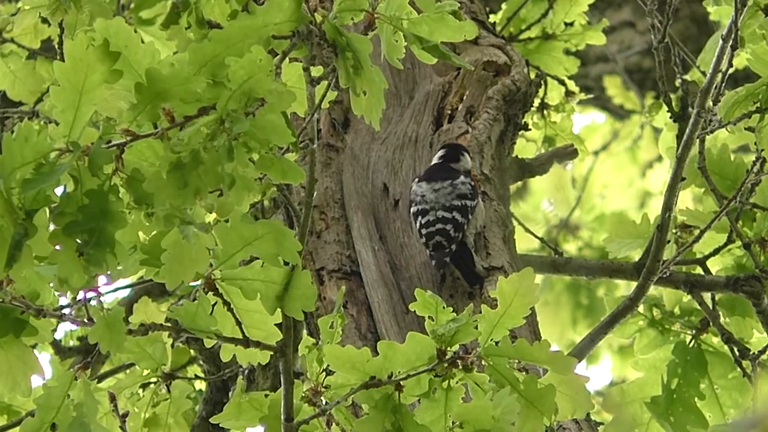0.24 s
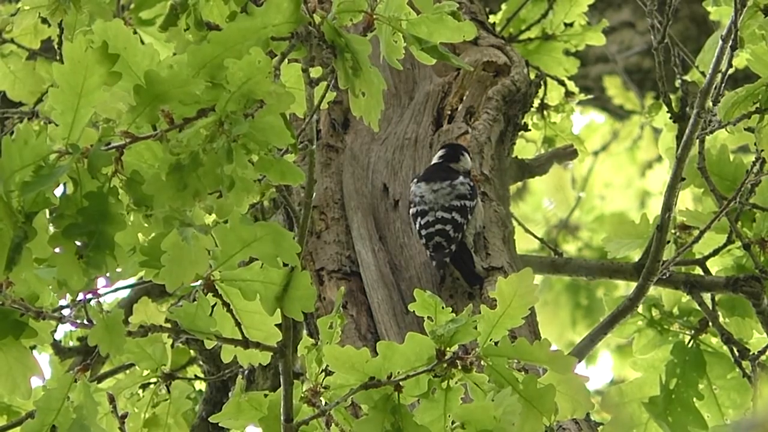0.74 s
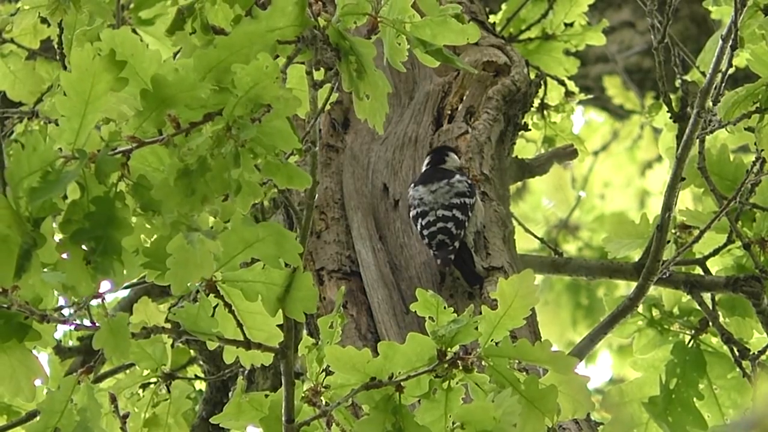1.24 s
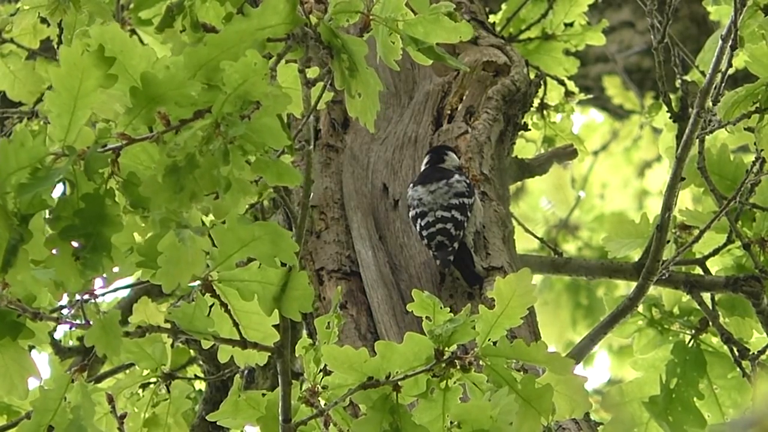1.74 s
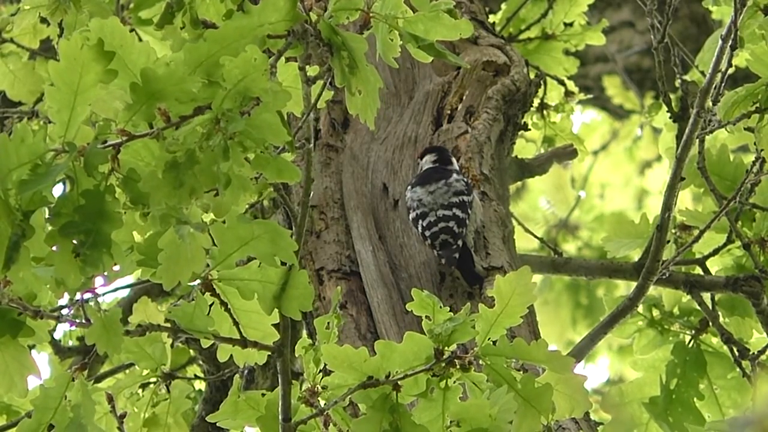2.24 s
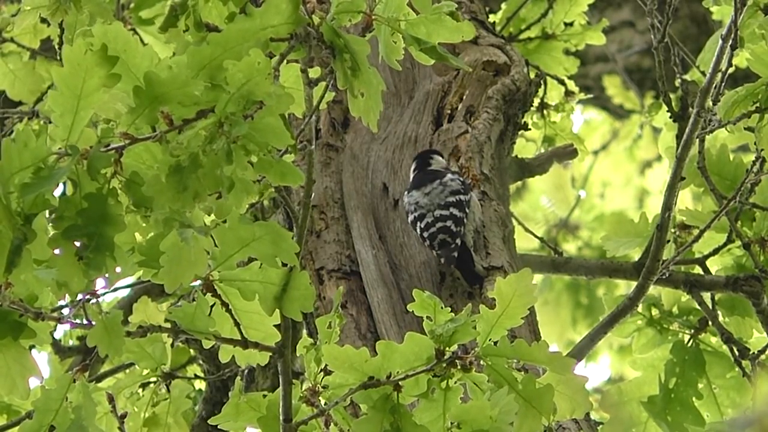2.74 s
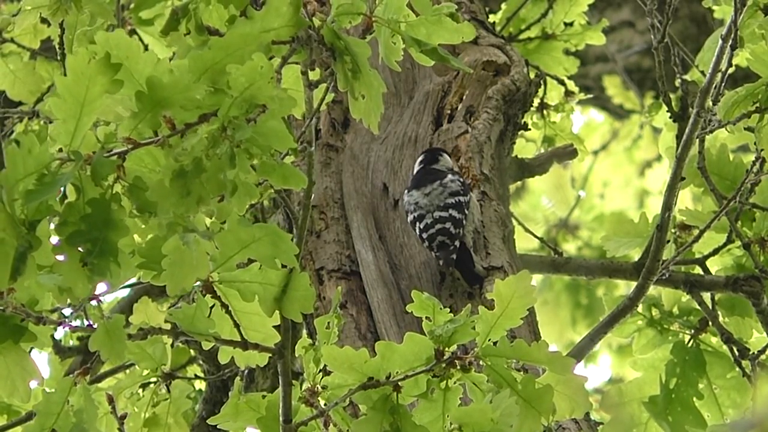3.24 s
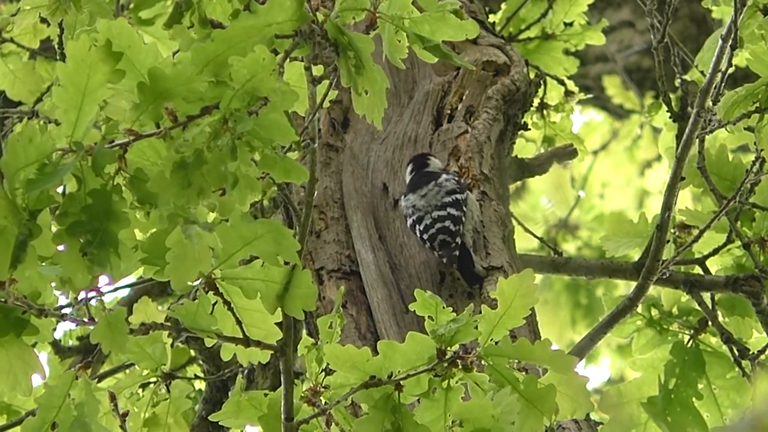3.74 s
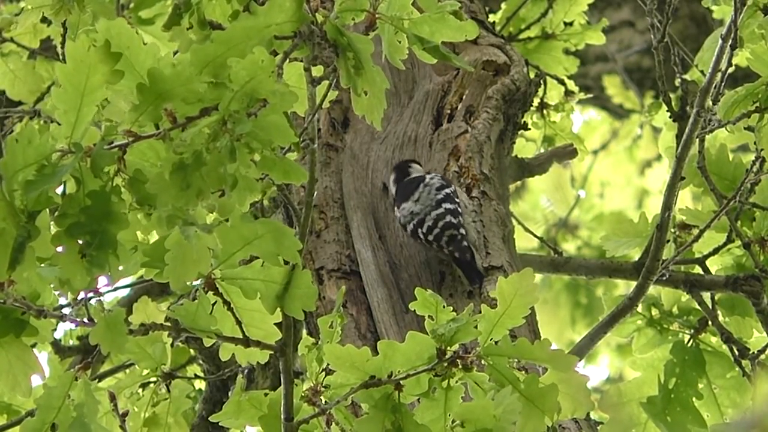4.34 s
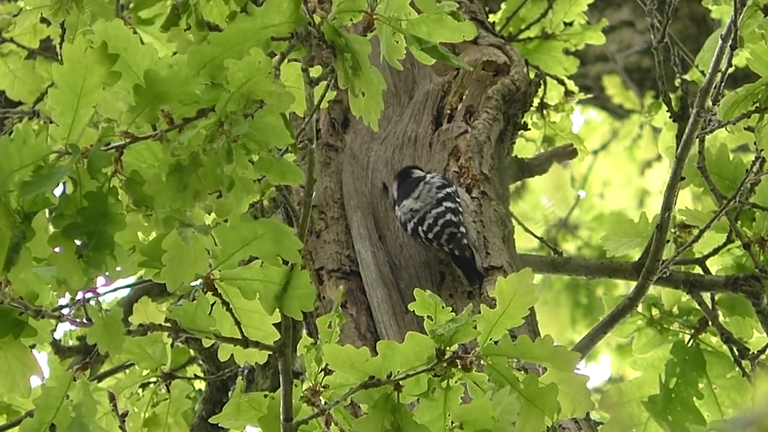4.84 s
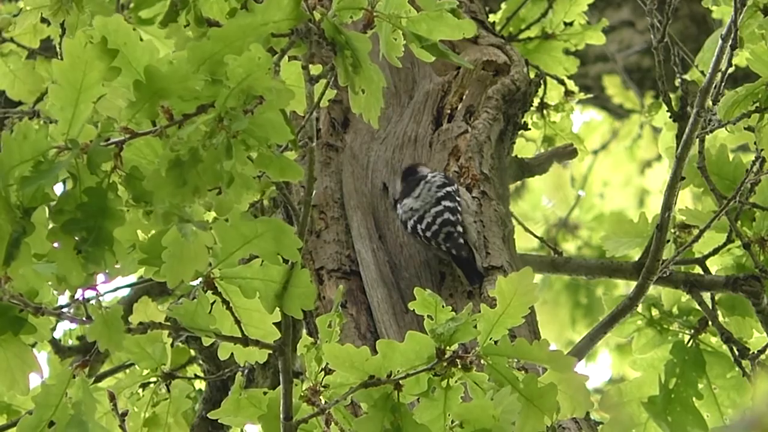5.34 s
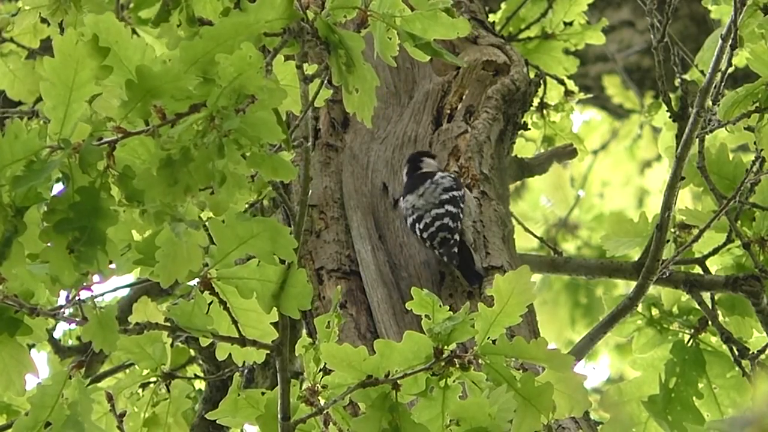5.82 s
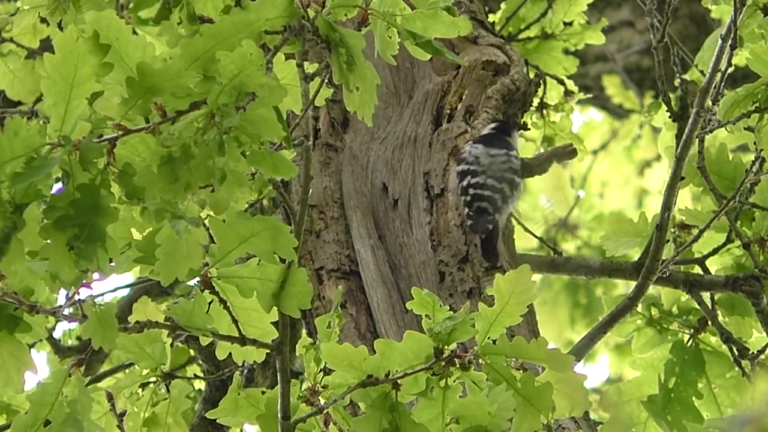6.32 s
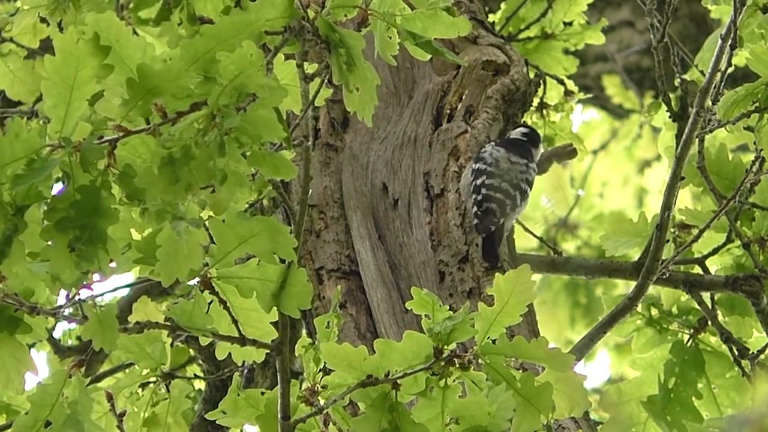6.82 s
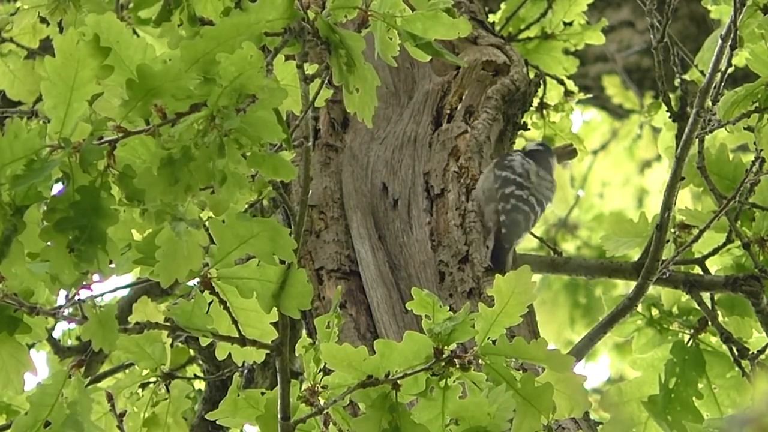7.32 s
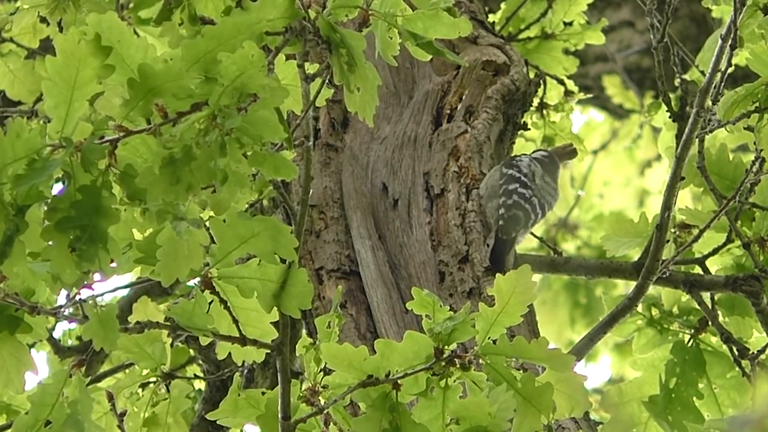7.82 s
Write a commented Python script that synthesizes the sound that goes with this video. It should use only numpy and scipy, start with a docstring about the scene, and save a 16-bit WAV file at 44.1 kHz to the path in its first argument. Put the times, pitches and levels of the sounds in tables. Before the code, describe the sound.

A hushed wood with low, soft air rumble and thin hiss that swells slightly now and then. From 0 to 4 seconds faint small birds give brief chirps, slurs and quick high trills, softly echoed by trees. From about 1.3 seconds a distant bird repeats a thin three-note high whistle more than twice a second, growing a little louder until about 5. At 4.0 seconds a woodpecker straight ahead starts one drum roll: weak first taps quickly become sharp, dry, hollow-woody knocks, around twenty per second, the pace flagging slightly twice, ending abruptly near 5.6. It dominates, with tight reflections and a short forest wash. Songbirds chirp through it and until about 6.7. Then it is quiet; around 7.2 to 7.3 three very soft, tiny wing puffs, the first two almost together, and faint lone whistles near 7.4 and 7.9.

```python
"""A small woodpecker drums one long roll, about twenty blows a second, on a dead trunk in quiet woods.
Each blow sums decaying trunk modes and a dry noise tick, then close limb reflections and a wash of trees.
Three soft wing puffs of coloured noise follow later, the first two nearly together.
Songbirds are gliding, trilled sines with echo; low rumble and swells of treble hiss are stereo noise."""
import sys
import numpy as np
from scipy import signal
from scipy.fft import rfft, irfft
from scipy.io import wavfile
from scipy.ndimage import uniform_filter1d

SR = 44100
rng = np.random.default_rng(int(sys.argv[2]) if len(sys.argv) > 2 else 0)


def dump_mix(stems):
    """Bounce the given channels to the path in sys.argv[1] as a 16-bit WAV at rate SR."""
    frames = np.atleast_2d(stems).T  # one column per channel
    limited = np.clip(frames, -1, 1)  # hard clip at full scale
    pcm = np.round(limited * 32767).astype(np.int16)
    wavfile.write(sys.argv[1], SR, pcm)


N = 355887

# Modes of the dead trunk. Each row: frequency in Hz, level in dB before the hardness tilt, t60 in seconds.
TRUNK_MODES = [(1225, -14.4, .021), (1344, -10.4, .0133), (2079, -14.8, .0082), (2743, -27.3, .0165),
               (2569, -29.2, .0153), (3207, -20.3, .0058), (3900, -31, .012), (1405, -39, .09),
               (1295, -43, .1), (4750, -38, .006)]
# Reflections from stem and limbs. Each row: delay in seconds, level in dB before the left-right split.
LIMB_REFLECTIONS = [(.002053, -10.9), (.003455, -13.8), (.005588, -18), (.006976, -23.6), (.008439, -19.4),
                    (.010134, -24.7), (.015567, -26), (.017762, -25), (.018505, -24.5), (.0246, -30)]
# Spectrum of the beak-tip tick. Each row: frequency in Hz, relative level in dB.
TICK_SPECTRUM = [(100, -30), (280, -27), (700, 0.5), (880, 4.5), (1040, 18), (4700, 2.5), (5800, -10),
                 (6600, -7), (7500, -15), (8600, -9.5), (10000, -12.5), (15000, -17)]
# Pace of the beak, which flags twice and recovers. Each row: time in seconds, blows per second.
BLOW_PACE = [(3.98, 17.912), (4.03, 20.236), (4.3, 20.09), (4.72, 19.624), (4.87, 18.418), (5.0, 20.124),
             (5.19, 19.716), (5.3, 18.611), (5.51, 19.127)]
# Force of the roll, before wind-up and chance. Each row: time in seconds, level in dB.
BLOW_FORCE = [(4.1, -2), (4.6, -1.3), (4.84, -3), (4.94, -3.5), (5.12, -1.5), (5.4, -1.6), (5.57, -3)]
# Decay of the woods' echo. Each row: frequency in Hz, t60 in seconds.
WOODS_DECAY = [(200, 0.86), (1300, 1.64), (2500, 1.3), (4000, 1.85), (7000, 0.75), (15000, 0.27)]
# Wing puffs. Each row: start in seconds, level in dB, time constant in seconds.
WING_PUFFS = [(7.22, -39.5, 0.0034), (7.235, -51, 0.0029), (7.285, -41.5, 0.0029)]
# Spectrum of a wing puff. Each row: frequency in Hz, relative level in dB.
FEATHER_SPECTRUM = [(40, -28), (110, 2), (200, 2), (320, 3), (500, -20), (900, -15), (2800, -22),
                    (5000, -41), (15000, -50)]
# Clearest songbird notes. Each row: start in seconds, length in seconds, first, middle and last pitch in Hz,
# level in dB, trill depth in Hz.
BIRD_NOTES = [ (0.0, 0.091, 3900, 3436, 3440, -59.5, -4), (0.059, 0.22, 1880, 2013, 2134, -64.5, 43),
              (.24, 0.067, 2880, 2915, 2900, -66, 0), (0.301, .42, 2065, 2159, 2030, -70, 50),
              (0.346, 0.043, 3950, 3650, 3180, -64, 58), (.59, .05, 2490, 2490, 2570, -68, 0),
              (1.036, 0.14, 2420, 2364, 2255, -59.5, -2), (1.198, 0.15, 2290, 2287, 2234, -64.5, 2),
              (1.92, 0.14, 4900, 5050, 5050, -63, -3), (1.958, 0.071, 7900, 8560, 8050, -68, 350),
              (2.077, .07, 7800, 8150, 7500, -71, -2), (2.075, .075, 11550, 11400, 10550, -73, 0),
              (2.135, .033, 6800, 5500, 5200, -64.5, 0), (2.149, .13, 5150, 5250, 5390, -59, 43),
              (2.349, .069, 5200, 4520, 4370, -63.5, 2), (2.43, 0.056, 4350, 4670, 4820, -58, 150),
              (2.75, 0.085, 5400, 5750, 6000, -57, 297), (2.923, 0.12, 6800, 6430, 5860, -64, 100),
              (3.018, .11, 6200, 6440, 6610, -62, 302), (3.502, 0.15, 6300, 6900, 6000, -77, 200),
              (3.561, 0.13, 4300, 4090, 4260, -63.5, 85), (3.749, 0.066, 3300, 3010, 3040, -62, 60),
              (3.769, 0.055, 2000, 2025, 1930, -64.5, 20), (3.85, 0.12, 7000, 7100, 7330, -77, 150),
              (3.865, .06, 5000, 5160, 5130, -69, 150), (4.373, 0.099, 3150, 3230, 3400, -56, 10),
              (4.504, 0.11, 5020, 5075, 5060, -64.5, 2), (4.594, .11, 3650, 3710, 3810, -56.5, 25),
              (4.82, .088, 4200, 4010, 3870, -55, 124), (4.896, 0.093, 5100, 5040, 5060, -59, 253),
              (5.02, 0.11, 4200, 3900, 3930, -53.5, 56), (5.169, 0.082, 3150, 3390, 3460, -54, 40),
              (5.3, 0.078, 3950, 3800, 3340, -52.5, 57), (5.471, 0.082, 3600, 3560, 3370, -56, 35),
              (5.602, 0.12, 2700, 2805, 2780, -62.5, -2.5), (5.781, .1, 3050, 3616, 3400, -52, 74.5),
              (5.948, 0.08, 3150, 2856, 2620, -57.5, 37), (6.071, 0.054, 5000, 4930, 4920, -62, 173),
              (6.107, 0.079, 3700, 3116, 2810, -56, 40), (6.22, 0.16, 2380, 2676, 2780, -61.5, 25),
              (6.619, 0.092, 2800, 2747, 2720, -72, 17), (7.65, .055, 5700, 5400, 5260, -75, 100)]
# Syllables repeated at an even pace. Each row: first start in seconds, end in seconds, period in seconds,
# length in seconds, first, middle and last pitch in Hz, level in dB.
REPEATED_SYLLABLES = [(2.538, 2.73, 0.078, .06, 6700, 5910, 5380, -58.5),
                      (2.688, 3.42, .21, .036, 3380, 3070, 2680, -63)]
# Distant bird's phrase. Each row: offset into the phrase in seconds, pitch in Hz,
# level in dB before the song's rise and the distance gains.
WHISTLE_PHRASE = [(0, 4543, -61.5), (.095, 3410, -65), (.155, 3683, -64.5)]
# Lone whistles of that bird. Each row: start in seconds, pitch in Hz, level in dB before the distance gains.
SINGLE_WHISTLES = [(.7, 4510, -70), (7.38, 4520, -70), (7.88, 4490, -68.5)]
# Spectrum of the still air. Each row: frequency in Hz, relative level in dB per Hz.
AIR_SPECTRUM = [(10, -16), (45, -3), (90, 0), (300, -1.5), (460, -7), (590, -16), (820, -18), (1120, -11.5),
                (2000, -15), (3500, -19), (4500, -21), (5300, -29), (7500, -33), (15500, -29)]
# Spectrum of the treble hiss. Each row: frequency in Hz, relative level in dB per Hz.
HISS_SPECTRUM = [(500, -9), (2000, 6.5), (3800, -1), (4500, 0), (5300, 0.5), (9000, -5.5), (15000, -5)]
# Left-right likeness of the noise beds. Each row: frequency in Hz, correlation from 0 to 1.
STEREO_LIKENESS = [(40, 0.27), (300, 0.1), (700, 0.33), (1500, 0.057), (4000, 0.07), (8000, 1),
                   (15000, 0.31)]
# Swells of treble hiss. Each row: peak time in seconds, half width at 1/e in seconds, peak level in dB.
HISS_SWELLS = [(.44, 0.24, -62.5), (.78, 0.11, -67), (2.8, 0.36, -66.5), (3.75, 0.38, -68.5),
               (5.3, .95, -64.5)]

ROLL_START_S, ROLL_END_S = 3.9787, 5.59
WIND_UP_DB, WIND_UP_S = -9.5, 0.046  # the first blows are weak while the bird winds up
HARD_DB, HARD_PER_DB = 1.36, 0.41  # hardness at 0 dB force, and its change per dB of force
UNEVEN_FORCE_DB, UNEVEN_HARD_DB = 0.55, 1  # rms chance from blow to blow
NOTE_ECHO_DB = -0.5  # the trees return a songbird note about as strongly as it arrives directly
SONG_START_S, PHRASE_S = 1.335, .418
SONG_ENTRY_DB, SONG_RISE_DB_PER_S = -11.5, 9.5  # the song starts softly, then rises to 0 dB
CHIRPS_PER_S, CHIRPS_END_S, CHIRP_S, CHIRP_DB = 3.5, 6.0, 0.0577, -77
CHIRP_LOW_HZ, CHIRP_HIGH_HZ, CHIRP_GLIDE = 2490, 4750, 0.085  # glide: largest fraction of the pitch
AIR_DB = -54.5
EDGE_HZ = 15850


def drumming(level_db=0, woods_db=-14, limb_side_db=3.0):
    """A roll of blows on one spot, its close reflections and its wash through the trees."""
    roll, crack = np.zeros(N), tick()
    for start_s, force_db, hard_db in blows():
        add(roll, start_s, gain_of(force_db + level_db) * blow(hard_db, crack))
    near = np.array([roll, roll])
    for k, (delay_s, db) in enumerate(LIMB_REFLECTIONS):
        # reflections alternate sides, the later ones farther out
        side_db = (-1) ** k * limb_side_db * np.sqrt(k)
        add(near[0], delay_s, gain_of(db + side_db / 2) * roll)
        add(near[1], delay_s, gain_of(db - side_db / 2) * roll)
    wash = woods(roll, early_db=9.5, early_t60_s=0.28, likeness=0.12)
    return near + gain_of(woods_db) * wash


def blows():
    """The beak rebounds at the roll's pace; stronger blows are harder. Yields (s, force dB, hardness dB)."""
    s = ROLL_START_S
    while s < ROLL_END_S:
        force_chance, hard_chance = rng.standard_normal(2)
        wind_up_db = WIND_UP_DB * np.exp((ROLL_START_S - s) / WIND_UP_S)
        force_db = np.interp(s, *np.transpose(BLOW_FORCE)) + wind_up_db
        hard_db = HARD_DB + HARD_PER_DB * force_db + UNEVEN_HARD_DB * hard_chance
        yield s, force_db + UNEVEN_FORCE_DB * force_chance, hard_db
        s += 1 / np.interp(s, *np.transpose(BLOW_PACE))


def blow(hard_db, crack, low_hz=1007, high_hz=4300, tick_db=-21, detune=0.0046, scatter=0.92):
    """The beak rings the trunk's modes; hardness tilts them in dB per octave and lifts the tick in dB."""
    t = np.arange(len(crack)) / SR
    ring = np.zeros(len(t))
    for k, (hz, db, t60_s) in enumerate(TRUNK_MODES):
        # the beak never lands on quite the same spot
        struck_hz = hz * (1 + detune * rng.standard_normal())
        tilt_db = hard_db * np.log2(hz / TRUNK_MODES[0][0])
        decay = gain_of(db + tilt_db - 60 * t / t60_s)
        ring += (-1) ** k * decay * np.sin(2 * np.pi * struck_hz * t)
    # the narrow stem radiates little bass, and the contact time limits the treble
    band = signal.butter(N=3, Wn=[low_hz, high_hz], btype="band", fs=SR, output="sos")
    ring = signal.sosfilt(band, ring)
    # one crack is common to all blows, one is fresh
    return ring + gain_of(tick_db + hard_db) * (crack + scatter * tick())


def tick(snap_s=0.0026, splinter_db=-15, splinter_s=0.051, rise_s=0.00035):
    """The beak tip snaps on dry fibres, which crackle briefly: coloured noise under a fade of unit energy."""
    t = np.arange(2048) / SR
    decay = np.exp(-t / snap_s) + gain_of(splinter_db) * np.exp(-t / splinter_s)
    fade = np.minimum(t / rise_s, 1) * decay
    return coloured(rng.standard_normal(len(t)), TICK_SPECTRUM) * fade / np.linalg.norm(fade)


def woods(x, early_db, early_t60_s, likeness):
    """Scatter from near foliage dies fast; the echo of far trunks lingers."""
    taps = rng.standard_normal((2, SR))
    likeness = np.clip(likeness, 0, 1)
    taps[1] = likeness * taps[0] + np.sqrt(1 - likeness ** 2) * taps[1]
    hz, t, bins = signal.stft(taps, SR, nperseg=256)
    late = gain_of(-60 * t / read(WOODS_DECAY, hz)[:, None])
    early = gain_of(early_db - 60 * t / early_t60_s)
    tail = signal.istft(bins * (late + early) * (t > .004), SR, nperseg=256)[1]
    return signal.fftconvolve(x[None], tail / np.linalg.norm(tail[0]), axes=1)[:, :N]


def wings():
    """Each row is a short soft puff of air with a brush of feathers."""
    out, t = np.zeros(N), np.arange(2048) / SR
    for start_s, db, length_s in WING_PUFFS:
        envelope = t / length_s * np.exp(-t / length_s)
        puff = coloured(rng.standard_normal(len(t)), FEATHER_SPECTRUM) * envelope
        puff = puff / np.linalg.norm(puff) * np.sqrt(length_s * SR)
        add(out, start_s, gain_of(db) * puff)
    return out


def songbirds(direct_db=0, whistle_s=0.095, far_direct_db=-4, far_woods_db=-4):
    """Twitter and more distant whistles, each heard directly and as the echo of the trees."""
    direct, scattered = np.zeros((2, N))
    for start_s, db, sound in twitter():
        add(direct, start_s, gain_of(db + direct_db) * sound)
        add(scattered, start_s, gain_of(db + NOTE_ECHO_DB) * sound)
    for start_s, hz, db in whistles():
        sound = note(whistle_s, hz, hz, hz, 0)
        add(direct, start_s, gain_of(db + far_direct_db) * sound)
        add(scattered, start_s, gain_of(db + far_woods_db) * sound)
    return direct + woods(scattered, early_db=1, early_t60_s=0.23, likeness=0.48)


def twitter(slur_trill_hz=20, chirp_trill_hz=70):
    """Single notes, repeated syllables and faint chance chirps. Yields (s, level dB, sound)."""
    for start_s, length_s, first_hz, middle_hz, last_hz, db, trill_hz in BIRD_NOTES:
        yield start_s, db, note(length_s, first_hz, middle_hz, last_hz, trill_hz)
    for first_s, end_s, period_s, length_s, first_hz, middle_hz, last_hz, db in REPEATED_SYLLABLES:
        for start_s in np.arange(first_s, end_s, period_s):
            yield start_s, db, note(length_s, first_hz, middle_hz, last_hz, slur_trill_hz)
    for when, height, slope in rng.random((round(CHIRPS_PER_S * CHIRPS_END_S), 3)):
        hz = CHIRP_LOW_HZ * (CHIRP_HIGH_HZ / CHIRP_LOW_HZ) ** height
        glide = CHIRP_GLIDE * (2 * slope - 1)
        chirp = note(CHIRP_S, hz * (1 - glide), hz, hz * (1 + glide), chirp_trill_hz)
        yield when * CHIRPS_END_S, CHIRP_DB, chirp


def whistles(count=9):
    """The distant bird repeats its phrase, growing louder, and also calls singly. Yields (s, Hz, level dB)."""
    for sung_s in PHRASE_S * np.arange(count):
        soft_db = min(SONG_ENTRY_DB + SONG_RISE_DB_PER_S * sung_s, 0)
        for offset_s, hz, db in WHISTLE_PHRASE:
            yield SONG_START_S + sung_s + offset_s, hz, db + soft_db
    yield from SINGLE_WHISTLES


def note(length_s, first_hz, middle_hz, last_hz, trill_hz, trills_per_s=95, waver=0.0056, flutter_db=2):
    """A near sine glides through three pitches, with a fast trill and a fluttering level; rms 1."""
    count = int(length_s * SR)
    u = np.linspace(0, 1, count)
    glide_hz = np.polyval(np.polyfit([0, .5, 1], [first_hz, middle_hz, last_hz], 2), u)
    trill_rate_hz = trills_per_s * (1 + 0.252 * drift(count, 0.0061))
    trill = np.sin(2 * np.pi * np.cumsum(trill_rate_hz) / SR)
    hz = glide_hz * (1 + waver * drift(count, 0.0041)) + trill_hz * trill
    swell = signal.windows.tukey(count, .4) * gain_of(flutter_db * drift(count, 0.0072))
    return evened(np.sin(2 * np.pi * np.cumsum(hz) / SR) * swell)


def background(air_db=0, swell_db=-1.0, flutter_db=0.5):
    """Low rumble and thin hiss of the woods, its level drifting; treble hiss swells now and then."""
    air = gain_of(AIR_DB + air_db + swell_db * drift(N, 0.31)) * stereo_noise(AIR_SPECTRUM)
    t = np.arange(N) / SR
    swell = sum(gain_of(db) * np.exp(-((t - peak_s) / width_s) ** 2) for peak_s, width_s, db in HISS_SWELLS)
    hiss = swell * gain_of(flutter_db * drift(N, .03)) * stereo_noise(HISS_SPECTRUM)
    return air + hiss


def stereo_noise(points):
    """Coloured noise of rms 1, partly shared by the two channels."""
    a, b = rfft(rng.standard_normal((2, N)))
    likeness = np.clip(read(STEREO_LIKENESS, np.fft.rfftfreq(N, 1 / SR)), -1, 1)
    right = likeness * a + np.sqrt(1 - likeness ** 2) * b
    return evened(coloured(irfft(np.array([a, right]), N), points))


def drift(count, span_s):
    """Smooth chance of rms 1 that changes over span_s seconds."""
    size = max(int(span_s * SR), 2)
    smooth = uniform_filter1d(rng.standard_normal(count), size)
    return evened(uniform_filter1d(smooth, size))


def coloured(x, points):
    """Filters a sound by the levels of the points."""
    hz = np.fft.rfftfreq(x.shape[-1], 1 / SR)
    return irfft(rfft(x) * gain_of(read(points, hz)), x.shape[-1])


def read(points, hz):
    """Interpolates the points on a log-frequency axis."""
    f, value = np.transpose(points)
    return np.interp(np.log(hz + 1), np.log(f + 1), value)


def add(mix, start_s, sound):
    """Mixes a sound in at start_s, cut at the end of the mix."""
    part = mix[max(round(start_s * SR), 0):][:len(sound)]
    part += sound[:len(part)]


def evened(x):
    """Scales to rms 1."""
    return x / np.sqrt(np.mean(x ** 2) + 1e-20)


def gain_of(db):
    """Decibels to amplitude."""
    return 10 ** (np.asarray(db) / 20)


def scene():
    """The woodpecker straight ahead, the woods all round."""
    return drumming() + wings() + songbirds() + background()


def record(dry):
    """The recorder's band limit: a linear-phase low-pass."""
    low_pass = signal.firwin(511, EDGE_HZ, window=("kaiser", 9), fs=SR)
    return signal.oaconvolve(dry, low_pass[None], "same")


dry = scene()
out = record(dry)
dump_mix(out)
```